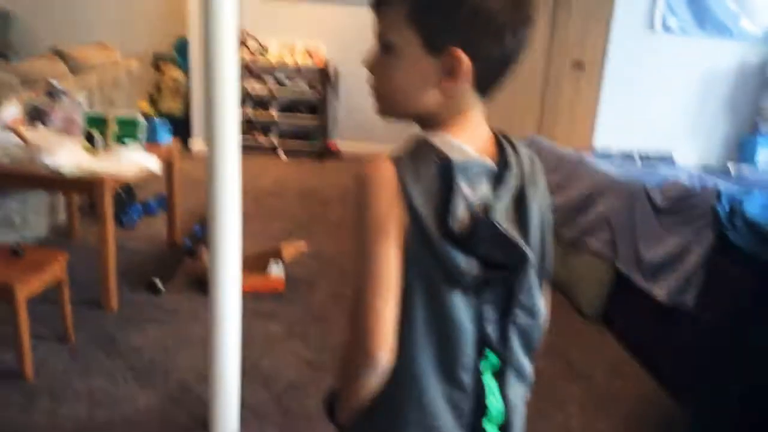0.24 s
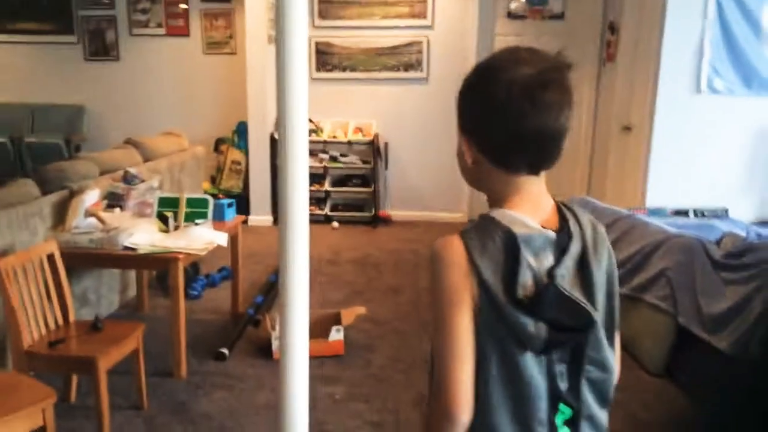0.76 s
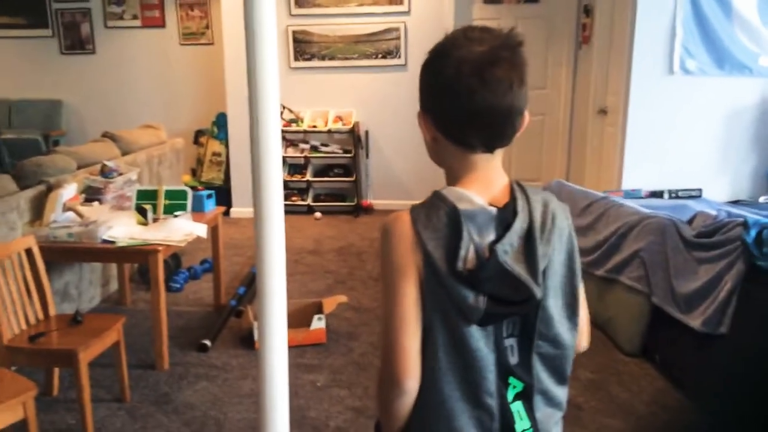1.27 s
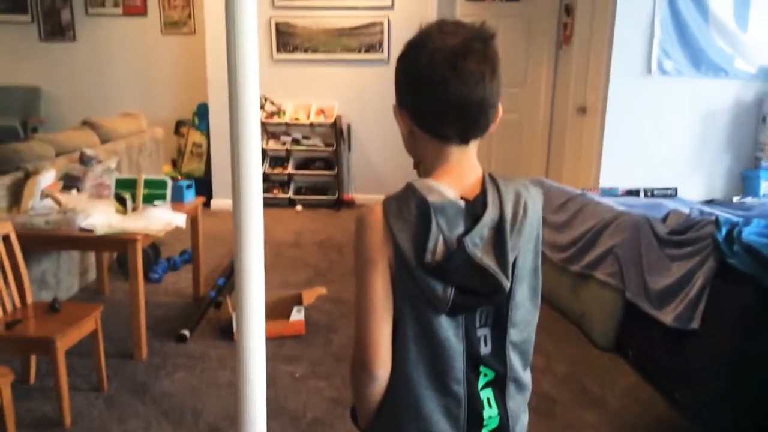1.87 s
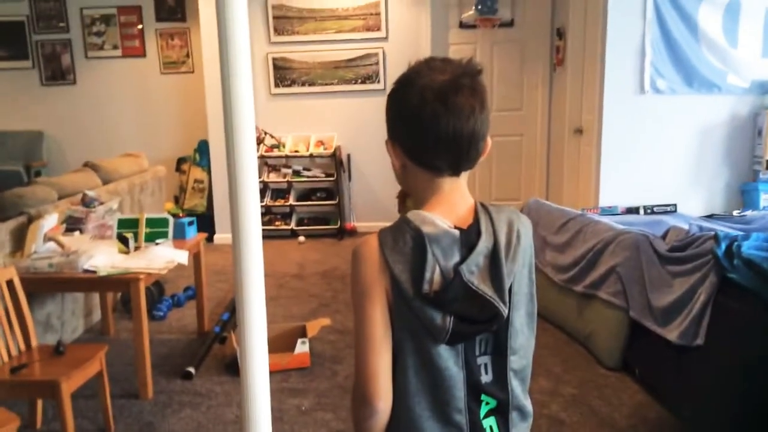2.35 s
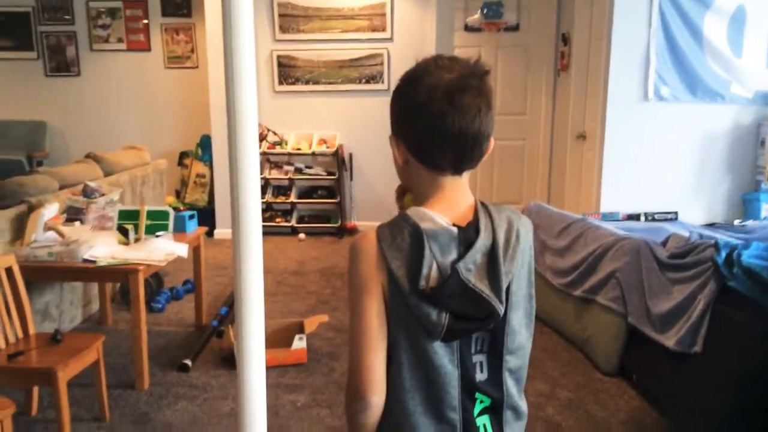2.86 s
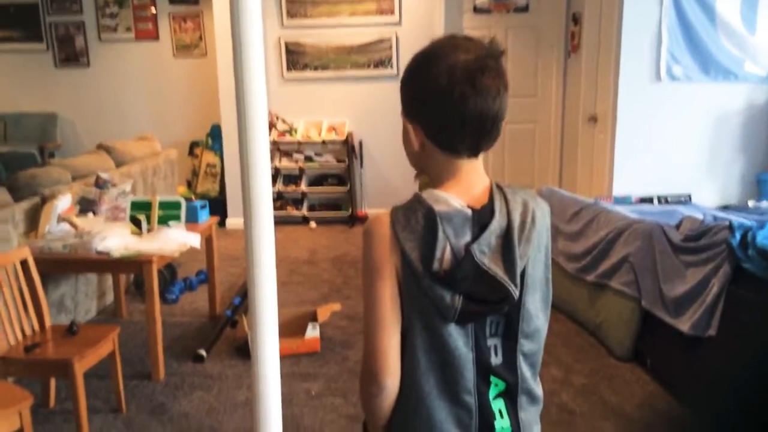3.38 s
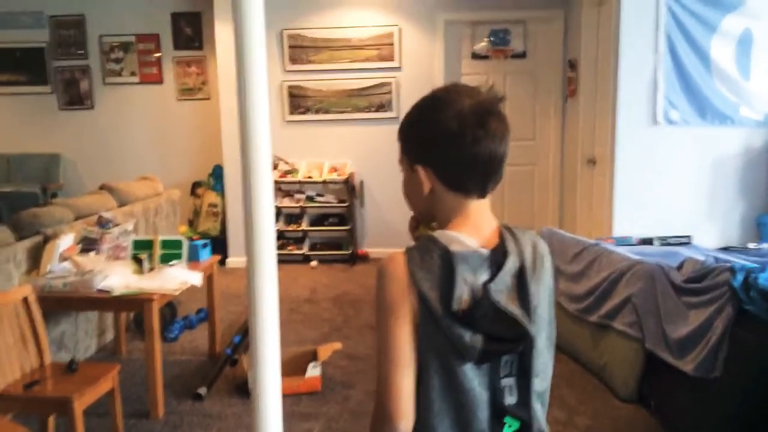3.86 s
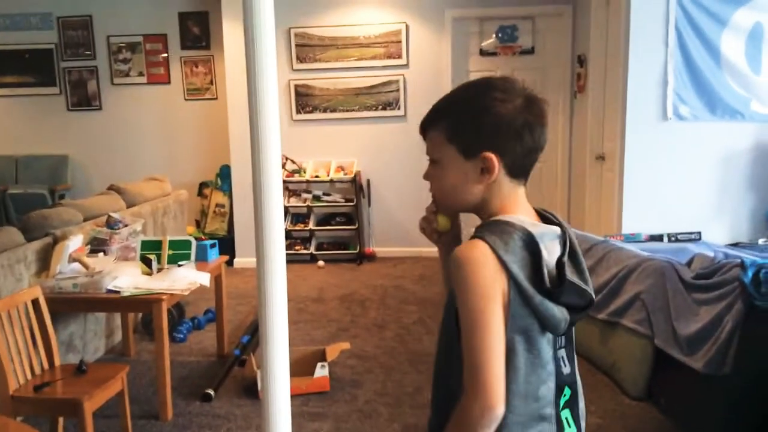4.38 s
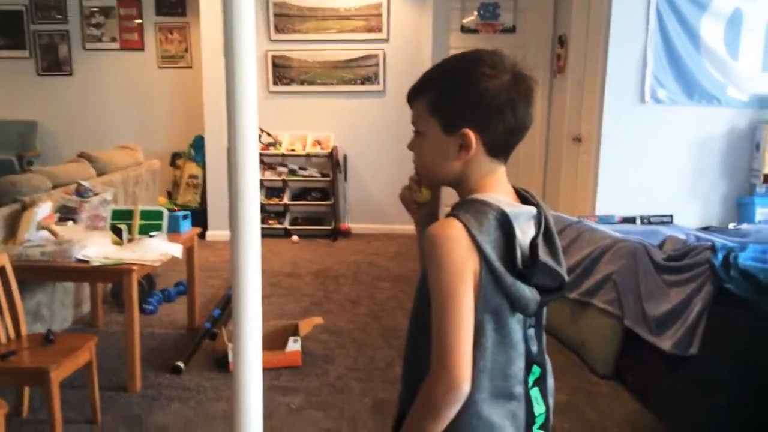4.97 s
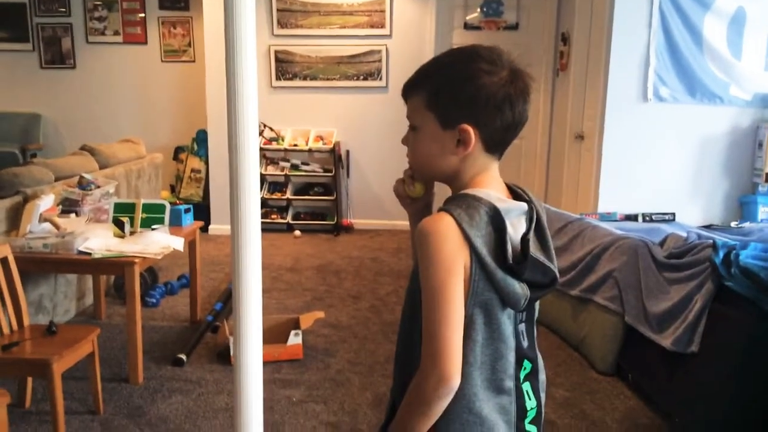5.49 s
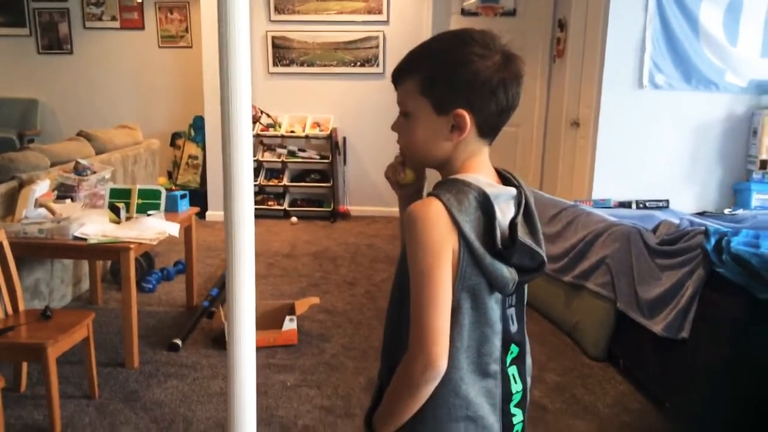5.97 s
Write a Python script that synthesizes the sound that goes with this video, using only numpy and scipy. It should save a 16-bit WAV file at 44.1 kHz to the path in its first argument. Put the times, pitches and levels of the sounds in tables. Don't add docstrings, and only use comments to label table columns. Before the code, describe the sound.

Close handling knocks, dry ticks and cloth rustle on a small microphone, with sharp blows and one heavy thump in a quiet carpeted room.

```python
import sys
import numpy as np
from scipy import signal
from scipy.io import wavfile
from scipy.ndimage import uniform_filter1d

SR = 44100
rng = np.random.default_rng(int(sys.argv[2]) if len(sys.argv) > 2 else 0)


def undo_db(level):
    steps = np.asarray(level, float) / 20
    return 10 ** steps


def generate_wav(sig):
    pcm = np.round(np.clip(np.atleast_2d(sig).T, -1, 1) * 32767).astype(np.int16)
    wavfile.write(sys.argv[1], SR, pcm)


N = 274787

# peak in seconds, level in dB, ring in Hz, time to fall 60 dB in seconds,
# sharp edge in dB above the ring.
KNOCKS = [(.0797, -29.5, 764, 0.0039, -12.5), (.3803, -26, 534, 0.013, -15), (.3946, -8, 520, 0.011, -20),
          (.3999, -32, 596, 0.013, 4), (.6755, -20.5, 584, 0.0048, -23), (.7409, -30.5, 580, 0.028, -10),
          (.8657, -41.5, 1287, 0.0076, -24.5), (1.1638, -29.5, 553, 0.013, -40.5),
          (2.594, -30.5, 638, 0.0038, -4), (2.709, -27.5, 531, 0.0043, -8.5),
          (2.8807, -32.5, 610, 0.0066, 1), (3.1672, -22.5, 447, 0.0038, -16), (3.3708, -39, 614, 0.022, -4),
          (3.3837, -27, 500, 0.012, -17), (3.392, -28.5, 420, 0.0037, -11), (3.4617, -33, 306, 0.0092, -37),
          (3.8996, -37, 390, 0.01, -1.5), (3.9196, -14.5, 330, 0.0026, -11.5),
          (3.9478, -29.5, 699, 0.0037, -13.5), (4.0056, -38, 1117, .008, -7.5),
          (5.2914, -24.5, 627, 0.0051, -24), (5.684, -39, 578, 0.016, -29.5)]
# peak in seconds, level in dB, ring in Hz, 60 dB fall in seconds.
MUFFLED_PADS = [(0.1575, -44.5, 660, 0.008), (0.1787, -50.5, 710, 0.0033), (.2839, -47.5, 640, 0.018),
                (.478, -47, 494, 0.046), (.488, -50, 720, .026), (0.5251, -49.5, 495, 0.023),
                (.69, -41, 487, 0.063), (0.879, -52.5, 530, 0.0099), (0.9202, -47, 580, 0.0079),
                (1.2718, -54.5, 509, 0.0093), (1.6893, -54, 249, 0.02), (1.86, -49, 399, 0.0099),
                (2.0706, -53.5, 330, 0.0076), (2.1018, -48.5, 346, 0.0055), (2.117, -51.5, 287, 0.0057),
                (2.177, -53, 307, 0.0064), (2.4528, -56, 371, 0.016), (2.6112, -45, 547, 0.027),
                (2.9599, -47.5, 412, 0.019), (3.063, -45, 287, 0.0019), (3.1076, -45.5, 1000, 0.0065),
                (3.3633, -40, 272.3, 0.026), (4.0687, -53, 326, 0.0087), (4.1343, -47, 816, 0.02),
                (5.1156, -59, 199.7, 0.022)]
# peak in seconds, level in dB, ring in Hz.
LIGHT_TAPS = [(.0539, -63, 520), (0.072, -42.5, 453), (.121, -48, 440), (.215, -45, 690), (.2755, -49, 814),
              (.4117, -49, 464), (.4638, -51, 530), (2.79, -49, 980), (2.8342, -49, 1170),
              (2.8933, -47, 580), (2.9745, -44.5, 750), (2.9966, -46, 440), (3.187, -42, 520),
              (3.3787, -35.5, 845), (4.126, -48, 950), (4.3449, -52.5, 834), (5.3041, -50, 300)]
# peak in seconds, level in dB, ring in Hz,
# 60 dB fall in seconds, sharp edge in dB above the ring.
SMALL_BUMPS = [(.388, -35.5, 560, 0.013, -14), (0.392, -22, 600, .008, -12), (.4012, -28.5, 620, .012, -14),
               (0.4057, -33, 700, 0.0072, -12), (.679, -38, 514, 0.009, -15), (0.686, -38, 520, .012, -20),
               (1.219, -57, 511, .008, -10), (1.252, -60, 533, 0.0094, -3), (1.491, -59.5, 457, 0.007, -6),
               (1.792, -55.5, 836, .008, -8), (1.887, -58.5, 783, 0.0078, -11.5),
               (1.933, -58.5, 800, .01, -14.5), (1.9914, -56.5, 580, .01, -7),
               (2.282, -53, 740, 0.012, -12), (2.309, -60, 700, 0.019, -16.5), (2.41, -60, 795, 0.011, -5),
               (4.113, -52, 1097, 0.0065, -13), (4.1717, -51.5, 447, 0.0086, -4),
               (4.1957, -50.5, 726, 0.0085, -1), (4.219, -56, 445, 0.011, -20),
               (4.255, -54.5, 420, .008, -4.5), (4.378, -56, 290, .016, -18), (4.4138, -50, 563, .016, -8),
               (4.483, -57.5, 698, .008, -11), (4.544, -56, 450, 0.0095, -2.5),
               (4.565, -53.5, 554, .018, -6), (4.585, -55.5, 600, .012, -0.5),
               (4.628, -54, 330, .012, -13.5), (5.297, -40, 319.2, .03, -28),
               (5.3168, -43.5, 706, .007, -14), (5.3216, -46, 600, 0.0068, -10.5),
               (5.338, -44, 480, .008, -9)]
# peak in seconds, level in dB, pitch in
# Hz, 60 dB fall in seconds.
THUDS = [
    (0.6743, -18, 231, 0.01),
    (.7385, -39, 620, 0.006),
    (0.733, -41, 126, 0.027),
    (1.868, -48.5, 160.4, 0.024),
    (2.848, -44.5, 157, 0.018),
    (3.9823, -25.5, 250, 0.01),
    (4.313, -56.5, 177, 0.031),
    (5.117, -45.5, 150, 0.023),
]
# peak in seconds,
# level in dB, pitch in Hz, 60 dB fall in seconds, rise in seconds.
INWARD_SWINGS = [
    (3.9828, -13.5, 1060, .013, 0.00044),
    (3.9828, -9, 1580, 0.0064, 0.00018),
    (3.9826, -15, 2500, .006, 0.0002),
    (3.9828, -22, 510, 0.013, 0.00043),
    (3.9811, -29, 2830, 0.0093, 0.00067),
    (0.6741, -22.5, 1660, .004, 0.00016),
    (5.2791, -3, 375.2, 0.0074, 0.00041),
    (5.2794, -10, 178.3, 0.012, 0.0011),
]
OUTWARD_SWINGS = [
    (.3942, -12, 2100, .007, .00015),
    (.3942, -11, 960, .008, .00015),
    (.3942, -20.5, 2940, .01, .0002),
    (.3942, -28, 4030, .01, .0003),
    (0.3954, -21, 1650, .012, .0002),
    (.6762, -17.5, 870, .0055, 0.00039),
]
# time in seconds, level in dB.
DRY_SNAPS = [(0.0914, -39), (0.406, -30), (0.4614, -42), (0.614, -46), (0.8589, -44), (2.713, -45),
             (2.8716, -41), (3.1773, -39), (3.2498, -42.5), (3.4044, -37.5), (3.8954, -42), (3.9158, -29.5),
             (3.9441, -45), (4.238, -51.5), (4.253, -47), (3.4619, -47.5)]
# time in seconds, level in dB, pitch in Hz.
SHELL_CRACKS = [
    (.8657, -43, 2920),
    (3.917, -36.5, 2400),
    (5.2908, -35.5, 1500),
    (5.2259, -40.5, 2285),
    (5.3165, -42.5, 1950),
    (5.3212, -37, 2000),
    (5.339, -40.5, 2100),
]
# time in seconds, level in dB, lower cavity in dB against the upper.
PORT_TICKS = [(.102, -34, -12), (.491, -30, -22), (.5253, -30.5, -18), (.5397, -36.5, -30),
              (.5428, -32, -26), (.6309, -24, -35), (.636, -42, -7), (.6715, -23.5, -14),
              (.6751, -19, -9.5), (.866, -36.5, -3.5), (2.71, -38, 3), (2.8802, -24, -3),
              (3.1784, -33.5, -14), (3.1866, -38.5, 7), (3.1996, -34, -14), (3.2053, -29.5, -38),
              (3.2497, -40, -4), (3.3768, -38.5, 4), (3.4046, -33, -1.5), (3.9114, -36.5, -12),
              (3.9594, -37, -5.5), (3.9698, -40.5, -4), (3.9826, -9, -4.5), (4.0075, -39.5, -3),
              (4.031, -41.5, -24), (4.133, -36.5, -8), (4.1695, -36, -11), (4.2029, -39, -16),
              (4.8502, -39.5, -6.5), (6.066, -36.5, -13)]
# time in seconds, level in dB.
CLOTH_CRACKLE = [(.5285, -43), (3.1707, -41), (3.1943, -39), (3.993, -47), (4.1815, -51), (4.209, -44),
                 (4.2502, -39), (4.7647, -40.5), (4.802, -43), (5.0799, -44.5), (5.0925, -42.5),
                 (5.1002, -43.5), (5.1437, -46.5), (5.1815, -48), (5.2961, -45.5), (5.3171, -43),
                 (5.4071, -43), (5.4161, -40), (5.4338, -51), (5.4601, -45.5), (5.4801, -47.5),
                 (5.5012, -49), (5.6279, -41.5), (5.6908, -40.5), (5.7308, -44), (5.811, -47.5),
                 (5.8315, -45), (5.8478, -46), (5.9386, -47.5), (5.9455, -40)]
# time in seconds, level in dB.
SKIN_SLIPS = [(.1372, -44), (0.1431, -41), (0.169, -47), (.4534, -44), (0.4648, -35.5), (.612, -45),
              (0.646, -42), (1.156, -49.5), (1.1605, -48.5), (2.8832, -37.5), (3.106, -44.5), (3.1448, -46),
              (3.3573, -39), (3.398, -37), (3.458, -46.5), (3.5221, -48), (3.9173, -42.5), (3.9797, -44),
              (4.024, -48), (4.1357, -47), (4.236, -45), (4.2381, -44.5), (4.259, -47.5), (4.7362, -50.5),
              (4.8089, -47), (5.0618, -49.5), (5.2256, -42.5), (5.543, -44), (6.057, -42.5), (6.099, -48)]
# start in seconds, length in seconds, level in dB.
CLOTH_DRAGS = [
    (.41, .15, -65),
    (.76, .1, -70.5),
    (3.14, .075, -64),
    (3.92, .11, -64),
    (4.162, .11, -73),
    (5.052, .15, -70.5),
    (5.36, .2, -78),
]
# time in seconds, pressure in dB, speed in dB.
HAND_STROKE = [(0, -74.5, 7), (.15, -68.5, 8), (.42, -54.5, 5.5), (0.601, -62, 5), (0.759, -55, 10),
               (.95, -67.5, -3), (1.45, -83, 5), (1.82, -73.5, 1.5), (2.398, -78, 2.5), (2.76, -71, -2.5),
               (3.3, -65, 4.5), (3.85, -83, -2.5), (4.09, -70.5, 1.5), (4.8, -74.5, -3), (5.12, -65, 10),
               (5.26, -56, -9.5), (5.55, -85, -1.5), (6.23, -81.5, 3)]
# level in dB at rest pressure,
# share of pressure in dB per dB, share of speed in dB per dB.
STROKE_SHARES = [(-75, 0.41, 0.35), (-81.5, 0.27, .7), (-78.5, 0.31, 0.26)]
# middle in seconds, length in seconds, body level in dB, dryness in dB.
SHORT_SCUFFS = [(0.073, 0.056, -63, -8), (0.265, 0.05, -68.5, -6), (0.341, 0.02, -52, -19),
                (0.398, 0.035, -43, -18), (0.469, 0.17, -58, -14), (0.704, 0.085, -58, -17),
                (0.85, 0.051, -62.5, -15), (1.162, 0.034, -53.5, -29), (1.719, 0.042, -63.5, -22),
                (2.599, 0.026, -48, -28.5), (2.879, 0.051, -54, -27), (3.099, 0.036, -83, 15.5),
                (3.181, 0.068, -58, -3.5), (3.39, 0.054, -45, -19), (3.933, .072, -46, -24),
                (3.989, 0.063, -54.5, -9.5), (4.133, 0.048, -60, -27), (4.242, 0.016, -65.5, 6.5),
                (4.34, .02, -62, -38), (4.567, 0.07, -69, -12), (5.32, 0.016, -60, -10.5),
                (5.966, 0.015, -70.5, 5)]
# level in dB, share of dryness in dB per dB.
SCUFF_SHARES = [(0, 0.014), (0, .4), (-1, 1), (-4.5, 0.73)]
# pitch in Hz, width in Hz, level in dB.
BODY_MODES = [(330, 200, -4.5), (580, 230, -1), (1060, 480, -1.5)]
# pitch in Hz, width in Hz, level in dB.
SHELL_MODES = [(1580, 460, -5.5), (2200, 870, 1), (2700, 1900, 2.5)]
# pitch in Hz, width in Hz, level in dB.
LOWER_CAVITY = [(4700, 2000, 0.5), (5860, 1200, -5.5)]
# pitch in Hz, width in Hz, level in dB.
UPPER_CAVITY = [(9100, 2000, -2), (10960, 4200, 1), (13820, 11000, -9)]
# delay in seconds, level in dB.
LENS_TICKS = [
    (0, -53),
    (.0025, -60),
    (.0052, -61),
]
# pitch in Hz, level in
# dB per Hz.
HUM_AND_HISS = [(20, -20), (44, 7.5), (62, 5.5), (100, -4.5), (200, -1.5), (420, -9.5), (1300, -20),
                (1900, -19), (3700, -23), (5500, -19.5), (6100, -26.5), (7900, -23.5), (8300, -20), (9700, -26),
            (11000, -17), (12300, -25.5), (15000, -26), (15650, -30), (15850, -52.5)]


def evened(x):
    return x / np.sqrt(np.mean(x ** 2) + 1e-20)


def add(mix, s, sound):
    part = mix[max(round(s * SR), 0):][:len(sound)]
    part += sound[:len(part)]


def swell(t, rise, t60):
    fall = np.log(1000) / t60
    peak = rise * np.log(1 / max(rise * fall, .05) - 1) if rise * fall < .5 else 0
    u = t + peak
    shape = np.exp(-fall * u - np.logaddexp(0, -u / rise))
    return shape / shape.max()


def ring(modes, soft=0.000051):
    t = np.arange(512) / SR
    sound = np.zeros(512)
    for k, (hz, width, db) in enumerate(modes):
        fade = np.exp(-np.pi * width * t)
        sound += (-1) ** k * undo_db(db) * fade * np.sin(2 * np.pi * hz * t)
    sound = sound * (1 - np.exp(-(t / soft) ** 2))
    return sound / abs(signal.hilbert(sound)).max()


def burst(chance, spread):
    t = (np.arange(len(chance)) - len(chance) // 2) / SR
    slips = chance * abs(chance) * np.exp(-(t / spread) ** 2)
    slips = slips + 6 * (t == 0)
    return slips / np.linalg.norm(slips)


def grains(modes, per_s, uneven_db):
    where, size, sign = rng.random((N, 3)).T
    strength = undo_db(uneven_db * np.minimum(-np.log(size + 1e-9), 4))
    train = (where < per_s / SR) * strength * np.sign(sign - .5)
    return evened(signal.oaconvolve(train, ring(modes))[:N])


def knocks():
    body, edges, lead = np.zeros(N), np.zeros(N), 882
    t = (np.arange(4000) - lead) / SR
    pads = [(*pad, -18) for pad in MUFFLED_PADS]
    taps = [(*tap, .011, -3) for tap in LIGHT_TAPS]
    rows = KNOCKS + pads + taps + SMALL_BUMPS
    for (s, db, hz, t60, edge_db), chance in zip(rows, rng.standard_normal((len(rows), 200))):
        t60 = np.clip(t60, .003, .04)
        padded = edge_db < -21.5 and 270 < hz < 900
        rise = 0.11 / hz if padded else min(0.075 / hz, 0.098 * t60)
        deep = hz < 270
        swing = np.cos(2 * np.pi * hz * t) if deep else np.sin(2 * np.pi * hz * t - .3)
        overtone_level = .15 if padded else .55 if hz > 450 else .3
        overtone = overtone_level * np.cos(2 * np.pi * 1.6 * hz * t + chance[0] * (hz > 270))
        add(body, s - lead / SR, undo_db(db + 4.0) * swell(t, rise, t60) * (swing + overtone))
        edge_hz = 1470 + 0.42 * hz + 10.5 * edge_db
        spot = ring([(edge_hz, 900, 0), (2.2 * edge_hz, 1200, -7), (2.4 * edge_hz, 700, -13)])
        add(edges, s - .0027, undo_db(db + edge_db + 6.0) * np.convolve(burst(chance, 0.00066), spot))
    for s, db, hz, t60 in THUDS:
        add(body, s - lead / SR, undo_db(db) * swell(t, 0.049 * t60, t60) * np.cos(2 * np.pi * hz * t))
    return body, edges


def hard_blows():
    out, lead = np.zeros(N), 882
    t = (np.arange(4000) - lead) / SR
    for way, table in ((1, INWARD_SWINGS), (-0.85, OUTWARD_SWINGS)):
        for s, db, hz, t60, rise in table:
            swing = swell(t, rise, t60) * np.cos(2 * np.pi * hz * t)
            add(out, s - lead / SR, way * undo_db(db) * swing)
    return out


def rattle(swings):
    t = np.arange(3000) / SR
    shake = rng.standard_normal(3000) * undo_db(-60 * t / 0.024) * (t > .003)
    tail = signal.oaconvolve(swings, shake / np.linalg.norm(shake))[:N]
    return signal.sosfilt(signal.butter(2, 380, "highpass", fs=SR, output="sos"), tail)


def snaps():
    out = np.zeros(N)
    for (s, db), chance in zip(DRY_SNAPS, rng.standard_normal((len(DRY_SNAPS), 200))):
        add(out, s - .0027, undo_db(db - 1.37) * np.convolve(burst(chance, 0.0006), ring(SHELL_MODES)))
    return out


def cracks():
    out = np.zeros(N)
    for (s, db, hz), chance in zip(SHELL_CRACKS, rng.standard_normal((len(SHELL_CRACKS), 200))):
        spot = ring([(hz, 700, 0), (1.28 * hz, 800, -8), (1.88 * hz, 450, -17)], soft=.00025)
        add(out, s - .0025, undo_db(db) * np.convolve(burst(chance, 0.000049), spot))
    return out


def ticks():
    out = np.zeros(N)
    crackle = [(*row, -19) for row in CLOTH_CRACKLE]
    slips = [(*row, -6.5) for row in SKIN_SLIPS]
    rows = PORT_TICKS + crackle + slips
    dull = signal.butter(10, 11800, fs=SR, output="sos")
    for (s, db, lower_db), chance in zip(rows, rng.standard_normal((len(rows), 100))):
        upper = ring(UPPER_CAVITY, soft=.00006 + 0.00063 * undo_db(db))
        port = upper + undo_db(lower_db) * ring(LOWER_CAVITY)
        spread = .00035 if db < -18 else .00008
        if db > -18:
            port = signal.sosfilt(dull, port)
        add(out, s - .0013, undo_db(db + 1.2) * np.convolve(burst(chance, spread), port))
    return out


def flurries():
    t = np.arange(N) / SR
    level = np.zeros(N)
    for s, length, db in CLOTH_DRAGS:
        level += undo_db(db) * ((t > s) & (t < s + length))
    crackle = grains(UPPER_CAVITY[:2] + [(14050, 3000, -4)], 160, 3.5)
    return uniform_filter1d(level, size=400) * crackle


def rubbing():
    t = np.arange(N) / SR
    s, *columns = np.transpose(HAND_STROKE)
    press_db, speed_db = (np.interp(t, s, column) for column in columns)
    levels_db = [press_db]
    for db, press_share, speed_share in STROKE_SHARES:
        levels_db.append(db + press_share * (press_db + 70) + speed_share * speed_db)
    levels = undo_db(np.array(levels_db))
    base_db, share = np.transpose(SCUFF_SHARES)
    for middle, length, db, dry_db in SHORT_SCUFFS:
        near = slice(max(round((middle - length) * SR), 0), round((middle + length) * SR))
        shape = np.exp(-(2 * (t[near] - middle) / length) ** 4)
        levels[:, near] += undo_db(db + base_db + share * dry_db)[:, None] * shape
    slips = [grains(BODY_MODES, 700, 2.9), grains(SHELL_MODES, 1200, 3.1),
             grains(LOWER_CAVITY, 1800, 3.1), grains(UPPER_CAVITY, 1900, 3.2)]
    top_edge = signal.butter(10, 15600, fs=SR, output="sos")
    return signal.sosfilt(top_edge, (levels * slips).sum(0))


def lens():
    out = np.zeros(N)
    tick = ring([(3700, 3500, 0.0), (5270, 1100, 3.5), (10985, 1500, -1)])
    starts = np.arange(.0537, N / SR, .1)
    for s, chances in zip(starts, rng.standard_normal((len(starts), 3, 100))):
        for (late, db), chance in zip(LENS_TICKS, chances):
            level = undo_db(db + 2 * chance[0])
            add(out, s + late, level * np.convolve(burst(chance, .0004), tick))
    return out


def air():
    frames = N // 256 + 5
    hz = np.fft.rfftfreq(1024, 1 / SR)
    a, b, patches = rng.standard_normal((frames, 513, 3)).T
    patches = uniform_filter1d(patches, size=12, axis=0)
    patches = evened(uniform_filter1d(patches, size=14, axis=1))
    f, db = np.transpose(HUM_AND_HISS)
    colour_db = np.interp(np.log(hz + 1), np.log(f + 1), db)[:, None]
    spectrum = (a + 1j * b) * undo_db(colour_db + 1.3 * patches)
    noise = signal.istft(spectrum, nperseg=1024, noverlap=768)[1][:N]
    return undo_db(-67) * evened(noise)


def scene():
    body, edges = knocks()
    hard = hard_blows()
    blows = body + hard + edges + undo_db(-17.0) * rattle(body + undo_db(-8.5) * hard)
    shell = snaps() + cracks()
    touch = ticks() + flurries() + rubbing()
    return (blows + shell + touch + lens() + air())[None]


def top_cut(x):
    return signal.sosfilt(signal.butter(12, 16480, fs=SR, output="sos"), x)


def record(dry):
    thin = signal.sosfiltfilt(signal.butter(2, 48, "highpass", fs=SR, output="sos"), dry)
    squeezed = np.sign(thin) * (.7 + .3 * np.tanh((abs(thin) - .7) / .3))
    mix = np.where(abs(thin) < .7, thin, squeezed)
    return top_cut(mix)


dry = scene()
out = record(dry)
generate_wav(out)
```